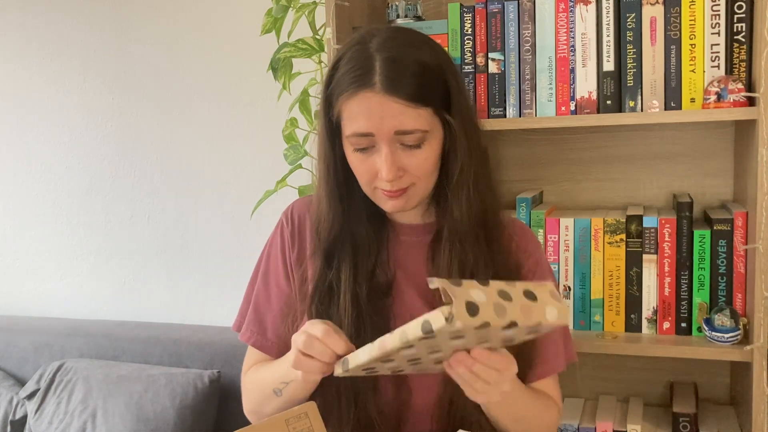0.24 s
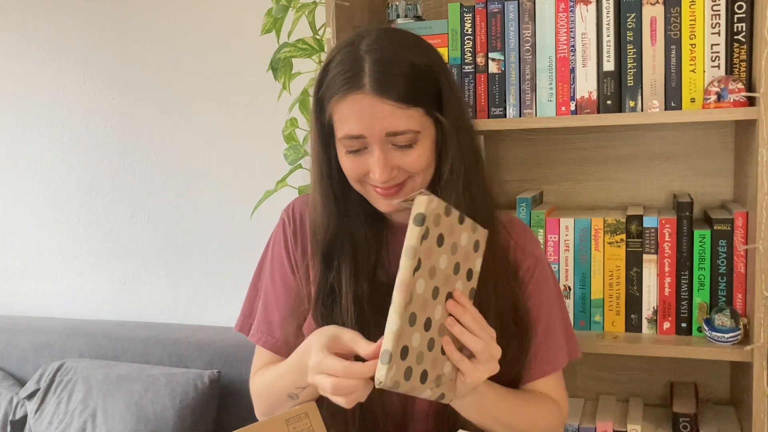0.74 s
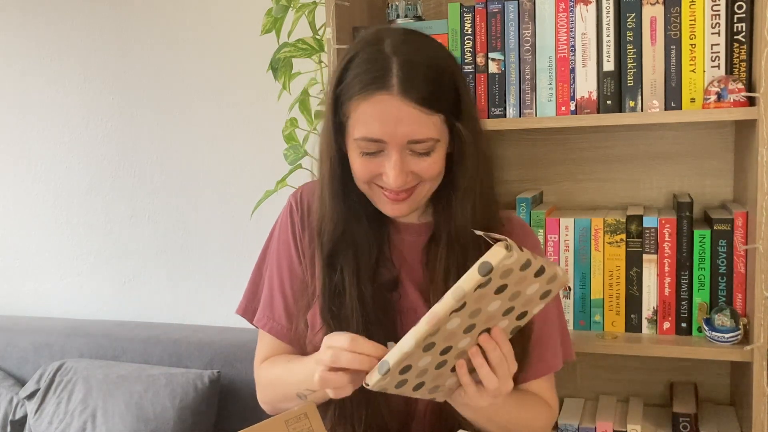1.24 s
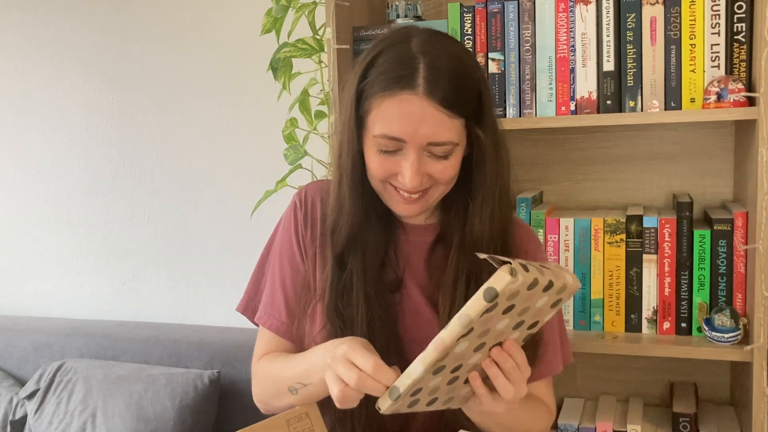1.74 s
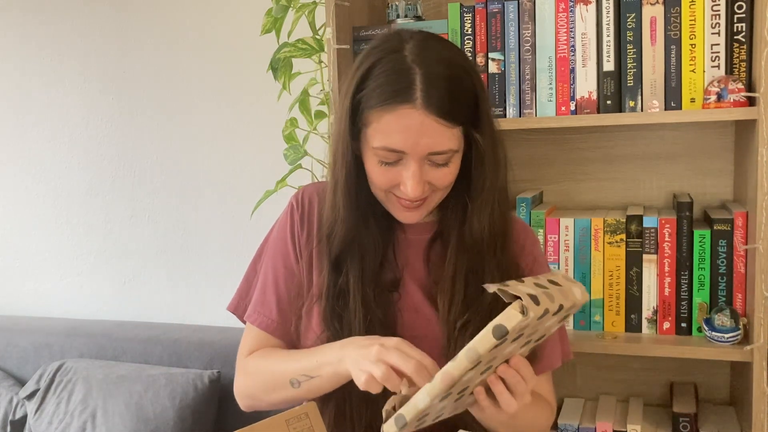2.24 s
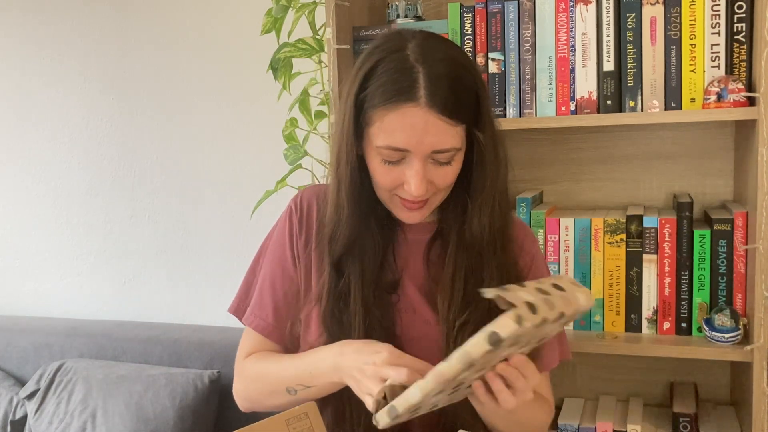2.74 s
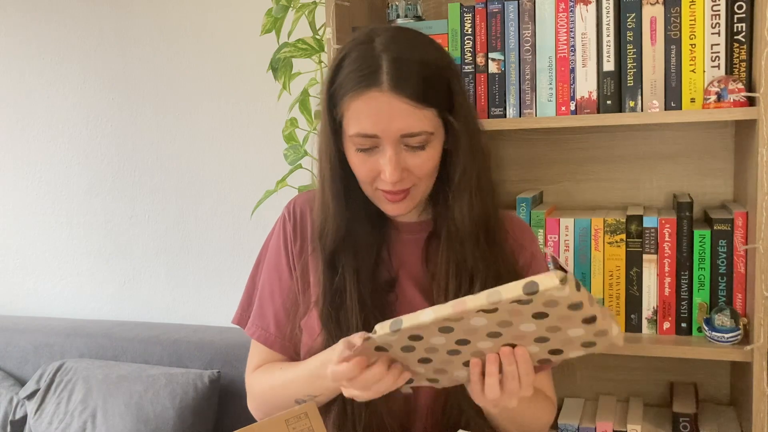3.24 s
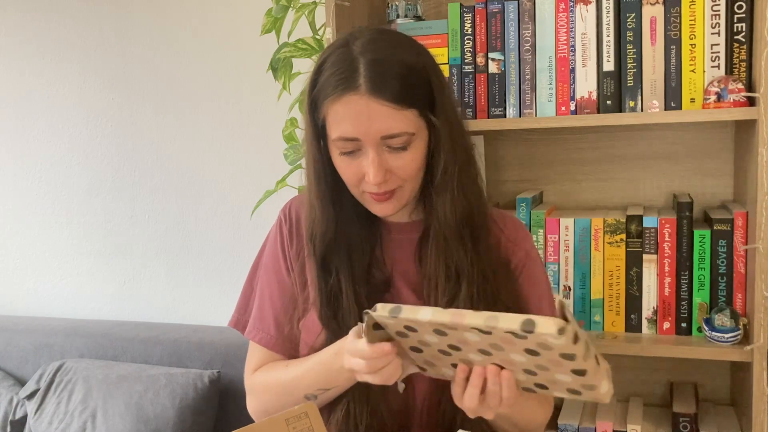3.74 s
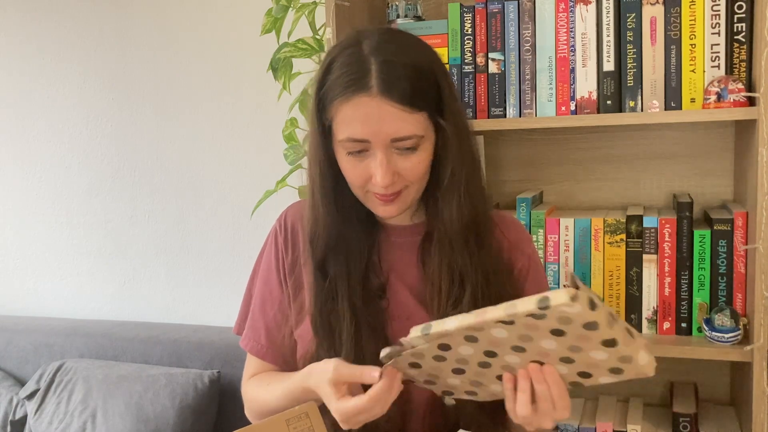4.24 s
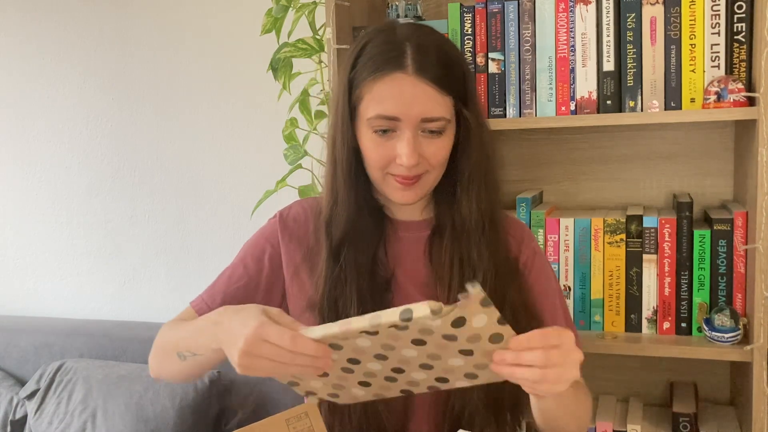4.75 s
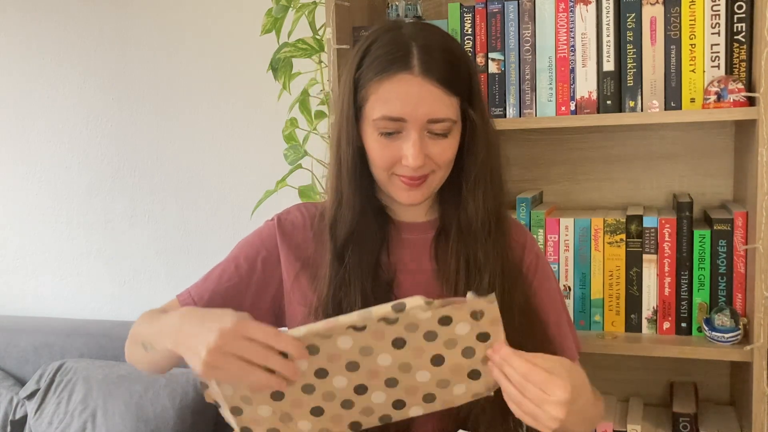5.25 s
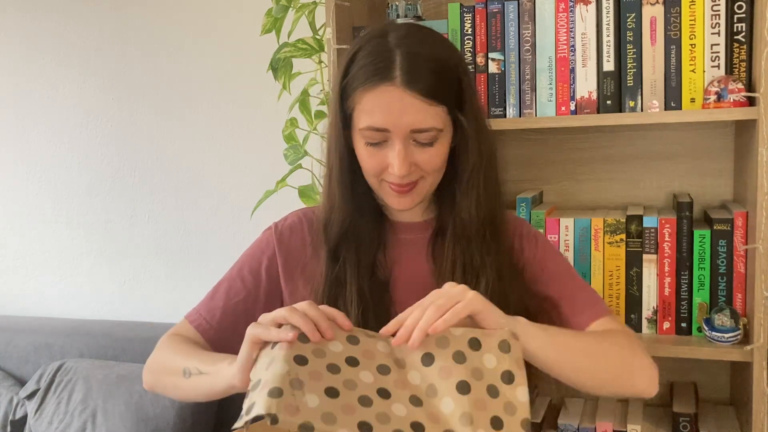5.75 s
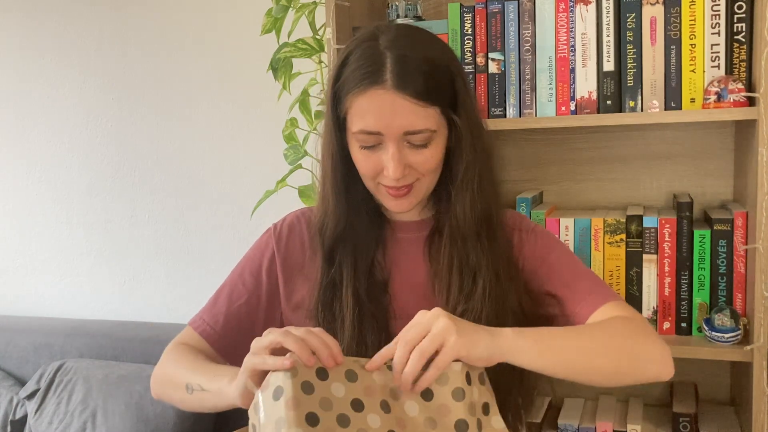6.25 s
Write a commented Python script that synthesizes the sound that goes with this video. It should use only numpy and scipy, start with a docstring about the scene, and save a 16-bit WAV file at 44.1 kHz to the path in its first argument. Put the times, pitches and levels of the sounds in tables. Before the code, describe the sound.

Hands pick open a book wrapped in stiff paper. At first there are small, sparse crinkles and a light finger rub, then sharper creases and a short ratchety peel of tape. Afterwards the crackling grows denser and louder, with hollow papery pops and bold snaps as the wrapping loosens. Close stereo microphone in a small furnished room with very short echo, faint low hum and hiss.

```python
"""Paper parcel picked open

Hands pick at the taped end of a book wrapped in stiff gift paper and pull it open in a small furnished room.
Creases snap as short shaped noise bursts; folds crumple and fingers rustle as showers of tiny buckles.
Fingertips ring patches of paper through resonances, loose panels pop as decaying sines, and peeling tape
plucks a tightening flap in quick slips. Room echoes follow the paper, over a low wavering hum and faint hiss."""
import sys
import numpy as np
from scipy import signal
from scipy.fft import rfft, irfft, next_fast_len
from scipy.io import wavfile
from scipy.ndimage import uniform_filter1d, map_coordinates

SR = 44100
rng = np.random.default_rng(int(sys.argv[2]) if len(sys.argv) > 2 else 0)


def generate_wav(sig):
    """Save sig (samples, or channels by samples) to the path in sys.argv[1] as 16-bit PCM at SR."""
    pcm = np.round(np.clip(np.atleast_2d(sig).T, -1, 1) * 32767).astype(np.int16)
    wavfile.write(sys.argv[1], SR, pcm)


N = 285838

# Source levels are ahead of the microphone colour.
# power spectrum shape of the room hum [f/Hz, relative level/dB]
HUM_SPECTRUM = [(25, -51), (45, -38), (70, -10.5), (86, -5), (100, 3.5), (118, -0.5), (220, -5),
                (450, -9.5), (1000, -12.5), (3000, -29.5), (16000, -46)]
# brief swells of a low tone [start t/s, length t/s, level/dB]
LOW_SWELLS = [(0.886, 0.3, -63), (2.31, 0.086, -63.5), (2.85, 0.21, -67)]
# how briskly the fingers move over the sheet [t/s, level/dB]
HANDLING_LEVELS = [(0, -83.5), (.6, -80.5), (1.04, -76.5), (1.28, -69.5), (1.68, -73.5), (1.85, -65.5),
                   (2.14, -71.5), (2.3, -56.5), (2.6, -66.5), (2.92, -73), (3.1, -59.5), (3.4, -70.5),
                   (3.8, -56), (4.27, -68.5), (4.47, -91), (4.62, -86), (4.75, -55.5), (5.06, -65.5),
                   (5.14, -66.5), (5.22, -61.5), (5.7, -60), (6.48, -57)]
# folds giving way: slack is hollow, taut is bright [start t/s, length t/s, level/dB, slack level/dB]
FOLD_CRUMPLES = [(0.068, 0.044, -60.5, -2.5), (0.171, 0.029, -62, -1.5), (0.352, 0.059, -69, 0),
                 (0.448, 0.021, -60.5, 6.5), (0.626, 0.06, -57.5, -2), (.872, 0.024, -53.5, -2),
                 (0.925, 0.08, -68, -7.5), (1.094, 0.043, -64.5, -15.5), (1.146, .1, -57, -7),
                 (1.295, 0.026, -65, -18), (1.452, 0.025, -65.5, -9), (1.58, 0.0098, -66, 8),
                 (1.758, 0.028, -55.5, -12), (1.856, 0.05, -48, -10), (2.02, .014, -54, -8),
                 (2.038, 0.011, -39.5, -9), (2.147, 0.026, -63, 4), (2.504, 0.045, -55.5, -11),
                 (2.571, 0.048, -55.5, -14.5), (2.738, 0.011, -40.5, -13.5), (2.888, 0.0034, -57.5, 4.5),
                 (2.956, 0.006, -55, 4.5), (3.053, 0.019, -52, -5), (3.168, 0.03, -47.5, -4.5),
                 (3.276, 0.0095, -53.5, -4.5), (3.366, 0.04, -59.5, 3.5), (3.472, 0.081, -50, 2.5),
                 (3.605, .035, -60, 10), (3.65, 0.027, -44, 0), (3.778, 0.019, -48, -1.5),
                 (3.917, .05, -53, 3), (4.066, 0.014, -52, 0), (4.162, 0.018, -42.5, -2),
                 (4.356, 0.025, -45, 0), (4.497, .05, -62, 4), (4.652, 0.01, -57.5, 4),
                 (4.748, 0.083, -49.5, 0), (4.946, 0.029, -49.5, 0.5), (5, 0.093, -56.5, 9),
                 (5.189, 0.094, -52.5, 6), (5.323, 0.024, -54.5, 9.5), (5.505, 0.021, -53, 1),
                 (5.557, 0.068, -53.5, 1.5), (6.044, 0.044, -45.5, 0), (6.095, 0.062, -44.5, 2),
                 (6.299, 0.024, -47, 4.5), (6.375, 0.0067, -44.5, 1), (6.416, 0.022, -47, 1.5)]
# the three voices of the paper, each a spectrum shape [f/Hz, relative level/dB]
FLAP_SPECTRUM = [(60, -33.5), (170, 0), (350, -4), (560, 3.5), (950, 5), (1400, -3.5), (2200, 0),
                 (5000, -33)]
CRINKLE_SPECTRUM = [(300, -27), (1000, -14.5), (1700, -1.5), (3700, -1), (5500, -4), (7500, -4),
                    (14000, -29.5)]
FIZZ_SPECTRUM = [(1500, -31), (4500, -6.5), (6500, -6), (9000, -2), (13000, -3.5), (16000, -6.5)]
# resonances of paper panels over the book [f/Hz, width f/Hz, relative level/dB]
PANEL_MODES = [(357, 12, -17), (484, 90, -7), (523, 47, -4), (880, 97, -12), (1017, 15, -16),
               (1260, 570, -3)]
# single creases [t/s, strength level/dB, flap level/dB and fizz level/dB re strength, echo level/dB re snap]
CREASE_SNAPS = [(.0635, -46.5, -13, -2, 1.5), (.1731, -44, -21, -4, -1), (.353, -53.5, -13, -5.5, -6),
                (.4925, -53, -15, -2, 0), (1.1452, -38.5, -9.5, -5.5, -3), (1.2943, -41.5, -26, 1, -7),
                (1.3168, -46.5, 0.5, 3, 1), (1.4088, -36, -20, -21, -3), (1.4759, -43.5, -5, -0.5, 0.5),
                (1.6132, -51, 7, 3, 1.5), (1.7643, -42, -2, -7, 0), (1.8352, -33, -16, -20, -4.5),
                (1.8639, -31.5, -24, -6, -4), (1.8887, -43.5, 7, 11.5, -22), (1.908, -43.5, -7, 6, -1.5),
                (2.0195, -40.5, -6, -8, -2), (2.0343, -39, -11, -7, -1), (2.0437, -30, -0.5, 7, 0),
                (2.2, -47.5, -18, -8, -2), (2.2454, -44, -20, 4, 0), (2.4974, -39.5, -26, -4, 1),
                (2.5681, -38.5, -12, -39, 8), (2.5732, -47.5, -35, 8, -32), (2.641, -45, -16, -1, 0.5),
                (2.6989, -48, -4, 2.5, -1.5), (2.7347, -24, -0.5, -4, -2.5), (3.0367, -52.5, -12, 0.5, 8),
                (3.0766, -46, 5, 0, -4), (3.1388, -42, 0, -2.5, -3.5), (3.1695, -41, -7, -3, -19),
                (3.1845, -36, 3, -10, -20), (3.22, -44.5, 8.5, 2.5, -15), (3.2964, -38, -1, -6.5, -1),
                (3.4639, -36, -14, -9.5, -4), (3.4999, -41, 3, -23, -10), (3.5234, -41, -15, -6, -1),
                (3.5904, -37.5, -20, -1, -2), (3.6631, -31.5, -25, 2.5, -10), (3.7721, -45.5, -25, -2, 5),
                (3.8681, -41, 3.5, 3, -6), (3.9092, -40, -4, -14, -2), (3.924, -41.5, 8, -7, -2),
                (3.9433, -39, -17, -10, -20), (3.9588, -38.5, -15, -4.5, -6), (4.1331, -49, 7, 8.5, -3),
                (4.1683, -43, 13, 2, -1), (4.2649, -44.5, 5.5, -4.5, 4), (4.2921, -45.5, 3, -9, 1.5),
                (4.3562, -36.5, -10, -1, -3), (4.3735, -33, -3, 1, -17.5), (4.5211, -42.5, 9.5, -19, -7),
                (4.64, -56, -6, -17, 2), (4.7205, -39.5, -2, -9.5, -2.5), (4.769, -43, -5, 6, -0.5),
                (4.7835, -39, -10, 3.5, 3.5), (4.805, -37.5, -16, 3, -13), (4.893, -40, 2, -12, -0.5),
                (4.9154, -46.5, 3, -1.5, 7.5), (4.9545, -39, -4, -4, -7), (4.994, -39.5, -1, 0, -3),
                (5.0596, -43.5, 5, -2.5, 1.5), (5.1882, -42.5, 7, -6, -8), (5.2345, -38, 11, 1, -4.5),
                (5.2692, -42, 12.5, -17, -9), (5.2978, -38, 8, -9, -4.5), (5.3228, -41.5, 12, -18, 2.5),
                (5.3656, -27.5, -48, -14, -7.5), (5.4211, -33.5, -5, -14, -5.5),
                (5.577, -34.5, -12, -0.5, -1), (5.5926, -30.5, -3.5, -10.5, -2),
                (5.775, -25.5, -5.5, -7, -4), (5.947, -35.5, 7, -35, -7.5), (5.9959, -50, -5, 2.5, -3),
                (6.1375, -41.5, 13, 7.5, -6), (6.153, -33.5, 1, -1, 0.5), (6.2121, -36.5, 3.5, -12, -4),
                (6.246, -48, -10, -25, 5), (6.279, -28.5, -7, -11.5, -7)]
# fingertips sliding over the wrapped cover [start t/s, end t/s, level/dB]
FINGER_SLIDES = [(0.46, 0.46, -63), (0.649, 0.74, -52.5)]
# resonances of the paper under a fingertip [f/Hz, width f/Hz, relative level/dB]
FINGERTIP_MODES = [(1014, 130, 1), (1370, 180, 2), (1910, 190, 8)]
# loose panels popping in or out against the book [t/s, f/Hz, level/dB]
PANEL_POPS = [(1.614, 1320, -41.5), (2.049, 537, -36), (3.64, 890, -28), (3.646, 1080, -29),
              (3.663, 940, -30.5), (4.5203, 1395, -34.5), (5.326, 890, -35), (6.116, 1080, -33),
              (6.2118, 1070, -32)]
# course of the peeling tape [t/s, slip rate f/Hz, level/dB, flap pitch f/Hz], before random scatter
TAPE_PEEL = [(2.29, 90, -52, 1300), (2.33, 97, -43, 1330), (2.395, 97, -42, 1380), (2.43, 105, -43.5, 1580),
             (2.485, 160, -46.5, 1740), (2.51, 160, -58, 1780)]
# modes of the taut flap [multiple of its pitch, relative level/dB, decay time constant t/s]
TAPE_MODES = [(1, 0, .0018), (1.4, -4, .0009), (2.5, -5, .0007), (3.2, -3, .0006)]
# decay time of the room to -60 dB [f/Hz, t/s]
ROOM_DECAY = [(150, 0.11), (500, 0.15), (1400, 0.18), (4000, .19), (9000, 0.19), (16000, 0.14)]
# near reflections, delays before random spread [t/s, level/dB re the echo tail]
WALL_REFLECTIONS = [(.0031, -4), (.0062, -8.5), (0.0092, -8), (0.0137, -23.5)]
# microphone colour of the centre and of the side [f/Hz, level/dB]
CENTRE_COLOUR = [(200, -3), (2000, -4), (6200, 0), (7200, -2), (8000, -1.5), (9300, 1), (10300, -2.5),
                 (11500, -4), (13200, 2.5), (15800, 0)]
SIDE_MIC_COLOUR = [(100, -12.5), (300, -16.5), (600, -16.5), (1100, -10.5), (3000, -8.5), (6000, -4.5),
                   (8800, -3.5), (11700, -2), (13500, -5), (15000, -7.5)]

# room hum: starting level (dB), slow rise (dB per s) and depth of its random wavering (dB)
HUM_DB, HUM_DB_PER_S, WAVER_DB = -68, .5, 1.9
RUSTLE_DB = -0.5  # steady rustle re the handling
JERK_DB = 1.5  # unevenness of rustle and crumpling
# the wrapping slackens as it comes open: slack at the start (dB) and its growth (dB per s)
SLACK_DB, SLACK_DB_PER_S = -6.5, 1.21
FIZZ_DB, FIZZ_PER_SLACK = -3, 0.77  # fizz re the level, and the dB it loses per dB of slack
FLIP_S = .00065  # time scale of a crease flip, before its spectrum is evened out
LEAD = 64  # samples kept ahead of each snap
# lesser creases: rate per second, level re the handling and its scatter either way (dB)
TICK_RATE, TICK_DB, TICK_SCATTER_DB = 18, 10.5, 4.5
# their flap and fizz re their strength, and their echo re the snap (dB)
TICK_FLAP_DB, TICK_FIZZ_DB, TICK_ROOM_DB = -6, -7, -6.5
PEEL_FIZZ_DB = -15  # glue noise re the slip
ECHO_DB = -3  # room echo of pops, slides and tape
TOP_HZ = 15900  # upper band limit


def amp(db):
    """Turn dB into a linear gain."""
    return 10 ** (np.asarray(db) / 20)


def unit(x):
    """Bring a sound to rms 1."""
    return x / np.sqrt(np.mean(x ** 2) + 1e-20)


def along(points, hz):
    """Read (f/Hz, value) points along a log frequency axis."""
    f, v = np.transpose(points)
    return np.interp(np.log(hz + 1), np.log(f), v)


def curves(rows):
    """Draw one automation curve at sample rate for each column after the time."""
    s, *cols = np.transpose(rows)
    return [np.interp(np.arange(N) / SR, s, c) for c in cols]


def wobble(rate, size):
    """Draw a smooth random curve of size points, with rate knots per point."""
    knots = rng.standard_normal(int(size * rate) + 4)
    return map_coordinates(knots, [np.arange(size) * rate])


def gate(start, end, rise_s, fall_s):
    """Hold a weight at 1 from start to end, with exponential flanks."""
    t = np.arange(N) / SR
    before = np.minimum(t - start, 0) / rise_s
    after = np.maximum(t - end, 0) / fall_s
    return np.exp(np.maximum(before - after, -40))


def add(track, s, sound):
    """Mix a sound into a track at s seconds."""
    start = int(np.clip(round(s * SR), 0, N - 1))
    track[..., start:start + sound.shape[-1]] += sound[..., :N - start]


def filtered(x, response):
    """Filter by a complex response of frequency."""
    m = next_fast_len(N + SR // 2)
    return irfft(rfft(x, m) * response(np.fft.rfftfreq(m, 1 / SR)), m)[..., :N]


def coloured(x, gain_db, size=1024):
    """Equalise with a causal minimum-phase filter, so that attacks stay sharp."""
    cepstrum = irfft(np.log(amp(gain_db(np.fft.rfftfreq(size, 1 / SR)))))
    # fold the cepstrum forward in time
    cepstrum[1:size // 2] *= 2
    cepstrum[size // 2 + 1:] = 0
    impulse = irfft(np.exp(rfft(cepstrum)))
    return signal.fftconvolve(x, impulse[None], axes=1)[:, :x.shape[1]]


def highpassed(x, cut_hz):
    """Roll off the bass at 12 dB per octave."""
    return signal.sosfilt(signal.butter(2, cut_hz, "highpass", fs=SR, output="sos"), x)


def resonances(modes, f):
    """Sum the responses of damped modes given as (f/Hz, width f/Hz, level/dB)."""
    return sum(amp(db) * 1j * f * w / (c * c - f * f + 1j * f * w) for c, w, db in modes)


def echo(x, build_s=0.00084):
    """Answer from the room in centre and side: near walls, then a dense tail, drawn anew on each call."""
    hz, t, z = signal.stft(rng.standard_normal((2, SR // 4)), SR, nperseg=256)
    decay = amp(-60 * t / along(ROOM_DECAY, hz)[:, None])
    tail = signal.istft(z * decay, SR, nperseg=256)[1]
    tail *= 1 - np.exp(-np.arange(tail.shape[1]) / SR / build_s)
    tail /= np.linalg.norm(tail[0])
    for delay, db in WALL_REFLECTIONS:
        sample = int(delay * SR * rng.uniform(.85, 1.15))
        tail[:, sample] += amp(db) * np.array([1, rng.choice([-1, 1])])
    return signal.fftconvolve(x, tail, axes=1)


def room_tone(hiss_db=-84, swell_s=.03):
    """Shape noise into a low, wavering house hum over a faint even hiss, joined by brief swells of a separate
    low rumble."""
    hum = unit(filtered(rng.standard_normal((2, N)), lambda hz: amp(along(HUM_SPECTRUM, hz))))
    low = unit(filtered(rng.standard_normal((2, N)), lambda hz: resonances([(112, 58, 0)], hz) ** 2))
    hum_db = HUM_DB + HUM_DB_PER_S * np.arange(N) / SR + WAVER_DB * wobble(2 / SR, N)
    swells = sum(amp(db) * gate(s, s + length, swell_s, swell_s) for s, length, db in LOW_SWELLS)
    return amp(hum_db) * hum + swells * low + amp(hiss_db) * rng.standard_normal((2, N))


def voices(db, slack_db):
    """Give the power of flap, crinkle and fizz: slack paper flaps more and fizzes less."""
    fizz_db = db + FIZZ_DB - FIZZ_PER_SLACK * slack_db
    return amp(np.vstack([db + slack_db, db, fizz_db])) ** 2


def buckles(rate, spread_db, life_s, spectrum, ripple_db, count=6):
    """Shower tiny buckles, mostly weak and a few strong, from facets that each have their own colour."""
    shower = np.zeros((2, N))
    t = np.arange(SR // 100) / SR
    for _ in range(count):
        strength = amp(spread_db * np.minimum(rng.exponential(size=N), np.log(20)))
        struck = rng.random(N) < rate / count / SR
        kicks = struck * strength * rng.choice([-1, 1], N)
        facet = rng.standard_normal((2, len(t))) * np.exp(-t / life_s)
        facet /= np.linalg.norm(facet, axis=1, keepdims=True)
        shower += signal.oaconvolve(kicks[None], facet, axes=1)[:, :N]
    # the sheet keeps bending, so its resonances drift
    z = signal.stft(shower, nperseg=256)[2]
    drift = uniform_filter1d(uniform_filter1d(rng.standard_normal(z.shape[1:]), 5, 0), 16, 1)
    shower = signal.istft(z * amp(ripple_db * unit(drift)), nperseg=256)[1][:, :N]
    return unit(coloured(shower, lambda hz: along(spectrum, hz)))


def rustle(rise_s=0.0029, fall_s=0.0029, room_db=-2, count=24):
    """Drive flapping panels, crinkles and fine fizz from finger movement and crumpling folds."""
    handling_db = curves(HANDLING_LEVELS)[0] + RUSTLE_DB
    power = voices(handling_db, SLACK_DB + SLACK_DB_PER_S * np.arange(N) / SR)
    for start, length, db, slack_db in FOLD_CRUMPLES:
        power += voices(db, slack_db) * gate(start, start + length, rise_s, fall_s)
    jerks = unit(amp(JERK_DB * wobble(110 / SR, N)))  # folds yield in fits and starts
    flap_level, crinkle_level, fizz_level = np.sqrt(power) * jerks
    flap = buckles(rate=1300, spread_db=3, life_s=0.00078, spectrum=FLAP_SPECTRUM, ripple_db=6.0)
    flap = unit(filtered(flap, lambda hz: amp(-6.5) + resonances(PANEL_MODES, hz)))
    crinkle = buckles(rate=1300, spread_db=9.0, life_s=0.00041, spectrum=CRINKLE_SPECTRUM, ripple_db=3.5)
    fizz = buckles(rate=1500, spread_db=5.5, life_s=0.00021, spectrum=FIZZ_SPECTRUM, ripple_db=3.5)
    direct = flap_level * flap + crinkle_level * crinkle + fizz_level * fizz
    track = direct.copy()
    # the parcel moves, so each stretch of rustle meets new reflections
    for part in np.array_split(np.arange(N), count):
        add(track, part[0] / SR, amp(room_db) * echo(direct[:, part]))
    return track


def snap(db, flap_db, fizz_db, shiver_db=-23, shiver_s=0.0037, ripple_db=2.5, size=2048):
    """Burst noise for a crease that flips abruptly while the sheet around it shivers briefly."""
    t = np.arange(size) / SR
    flip = 2 * t / FLIP_S * np.exp(-2 * t / FLIP_S)
    envelope = flip + amp(shiver_db) * np.exp(-t / shiver_s)
    spectrum = rfft(np.roll(rng.standard_normal((2, size)) * envelope, LEAD, axis=1))
    # a sudden flip feeds all frequencies fairly evenly
    burst = irfft(spectrum / np.abs(spectrum) ** (2 / 3))
    burst *= amp(db + 26.5) / np.linalg.norm(burst, axis=1, keepdims=True)
    hollow = [(hz, flap_db + level) for hz, level in [(50, -21), (200, -14.0), (500, -3), (950, 1.0)]]
    colour = hollow + [(1700, -2.0), (4200, -0.8), (8500, fizz_db + 1.5), (16000, fizz_db - 7.0)]
    return coloured(burst, lambda hz: along(colour, hz) + ripple_db * wobble(1 / 20, len(hz)))


def bending(x, lag_s=0.00496, corner_hz=750):
    """Delay low pitches, where bending waves are slower, so the hollow part of a snap comes late."""
    return filtered(x, lambda hz: np.exp(-2j * np.pi * lag_s * corner_hz * np.arctan(hz / corner_hz)))


def snaps(rows):
    """Snap creases one by one, with a room answer for each."""
    track = np.zeros((2, N))
    for s, db, flap_db, fizz_db, room_db in rows:
        sound = snap(db, flap_db, fizz_db)
        add(track, s - LEAD / SR, sound)
        add(track, s - LEAD / SR, amp(room_db) * echo(sound))
    return bending(track)


def ticks():
    """Scatter lesser creases, as rows for snaps(): stronger where the fingers are busier."""
    draws = rng.random((int(TICK_RATE * N / SR), 2))
    times = draws[:, 0] * N / SR
    scatter_db = TICK_SCATTER_DB * (2 * draws[:, 1] - 1)
    levels = np.interp(times, *np.transpose(HANDLING_LEVELS)) + TICK_DB + scatter_db
    return [(s, db, TICK_FLAP_DB, TICK_FIZZ_DB, TICK_ROOM_DB) for s, db in zip(times, levels)]


def slides(rise_s=0.0046, fall_s=0.0037):
    """Catch skin on the paper's grain, which rings the patch under the finger."""
    grain_spectrum = [(400, -5), (900, 6.5), (2200, -10), (5000, -12)]
    grain = buckles(rate=1000, spread_db=1.0, life_s=0.00045, spectrum=grain_spectrum, ripple_db=4.0)
    pressure = sum(amp(db) * gate(start, end, rise_s, fall_s) for start, end, db in FINGER_SLIDES)
    direct = pressure * unit(filtered(grain, lambda hz: resonances(FINGERTIP_MODES, hz)))
    return direct + amp(ECHO_DB) * echo(direct)[:, :N]


def pops(life_s=0.0028, overtone_db=-9, overtone=1.285, cut_hz=300):
    """Flip panels that ring for a few cycles, with a weaker second mode."""
    track, t = np.zeros((2, N)), np.arange(SR // 25) / SR
    for s, hz, db in PANEL_POPS:
        ring = np.sin(2 * np.pi * hz * t) + amp(overtone_db) * np.sin(2 * np.pi * hz * overtone * t)
        pop = amp(db) * ring * np.exp(-t / life_s) * np.array([[1], [.5]])  # centre, side
        add(track, s, pop)
        add(track, s, amp(ECHO_DB) * echo(pop))
    return highpassed(track, cut_hz)  # a small light panel radiates no bass


def tape(scatter_db=3.5, glue_s=0.0011, cut_hz=900):
    """Release tape in quick, nearly regular slips that pluck the flap, which tightens as it goes."""
    rate, db, pitch = curves(TAPE_PEEL)
    turns = np.floor(np.cumsum(rate * (1 + .1 * wobble(60 / SR, N))) / SR)
    slips = np.flatnonzero(np.diff(turns))
    peeling = (slips > TAPE_PEEL[0][0] * SR) & (slips < TAPE_PEEL[-1][0] * SR)
    direct, t = np.zeros((2, N)), np.arange(SR // 100) / SR
    for i in slips[peeling]:
        pluck = np.zeros(len(t))
        for multiple, level, life in TAPE_MODES:
            hz = multiple * pitch[i] * rng.normal(1, 0.095)
            pluck += amp(level) * np.exp(-t / life) * np.sin(2 * np.pi * hz * t)
        glue = amp(PEEL_FIZZ_DB) * np.exp(-t / glue_s) * rng.standard_normal((2, len(t)))
        slip = pluck * np.array([[1], [.5]]) + glue
        add(direct, i / SR, amp(db[i] + rng.normal(0, scatter_db)) * slip)
    direct = highpassed(direct, cut_hz)
    return direct + amp(ECHO_DB) * echo(direct)[:, :N]


def scene(bass_hz=120):
    """Mix paper and room as centre and side, colour them and spread them to left and right."""
    paper = snaps(CREASE_SNAPS) + pops() + rustle() + slides() + tape() + snaps(ticks())
    paper = highpassed(paper, bass_hz)  # a light sheet radiates no deep bass
    mid, side = paper + room_tone()
    mid = filtered(mid, lambda hz: amp(along(CENTRE_COLOUR, hz)))
    side = filtered(side, lambda hz: amp(along(SIDE_MIC_COLOUR, hz)))
    return np.array([mid + side, mid - side]) * amp([[.3], [-.3]])  # left slightly louder


def record(dry):
    """Cut everything above the recorder's band limit."""
    return filtered(dry, lambda hz: hz < TOP_HZ)


dry = scene()
out = record(dry)
generate_wav(out)
```